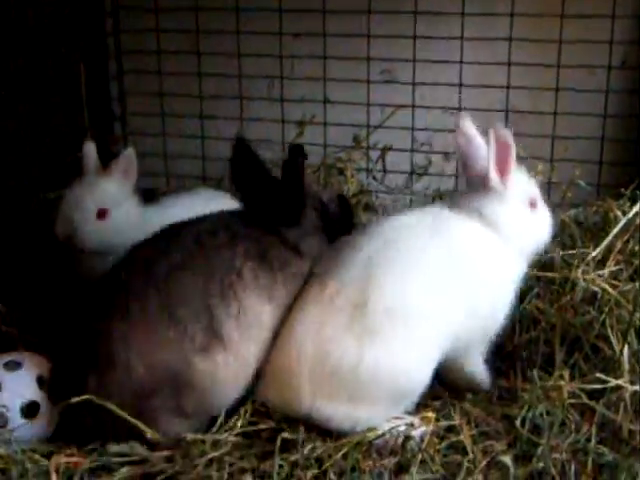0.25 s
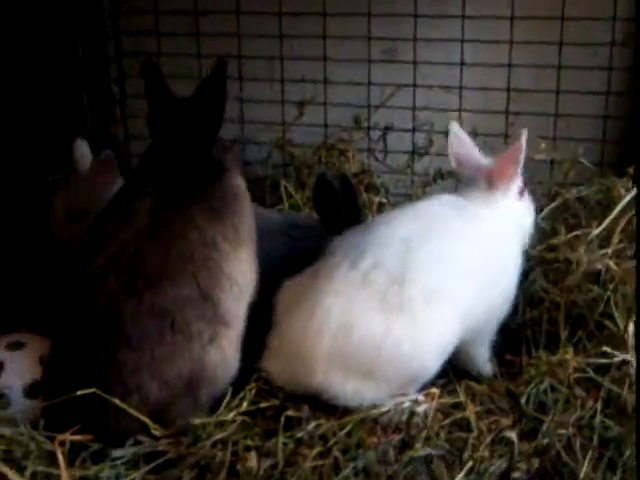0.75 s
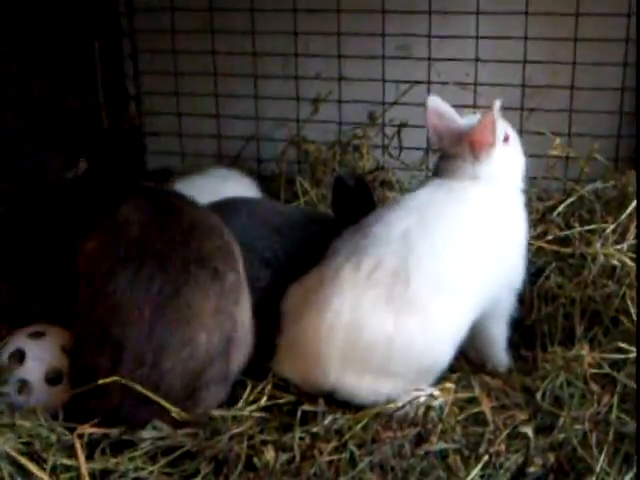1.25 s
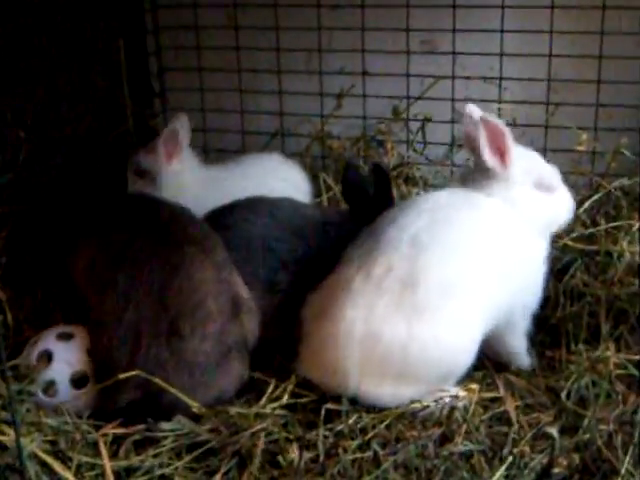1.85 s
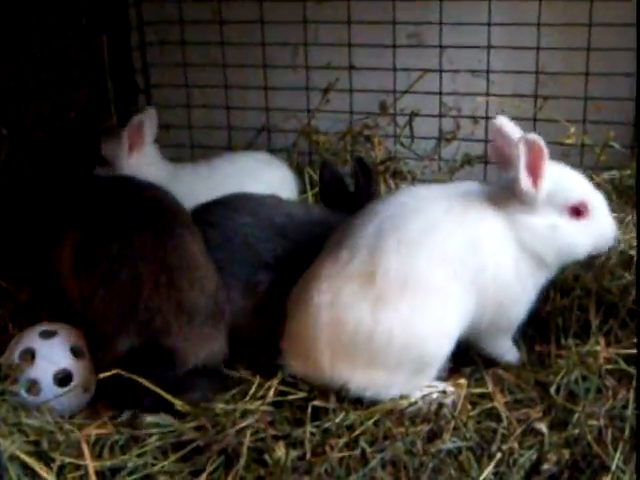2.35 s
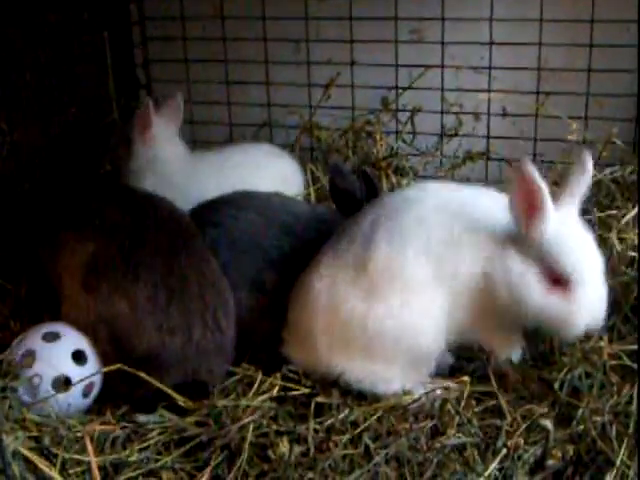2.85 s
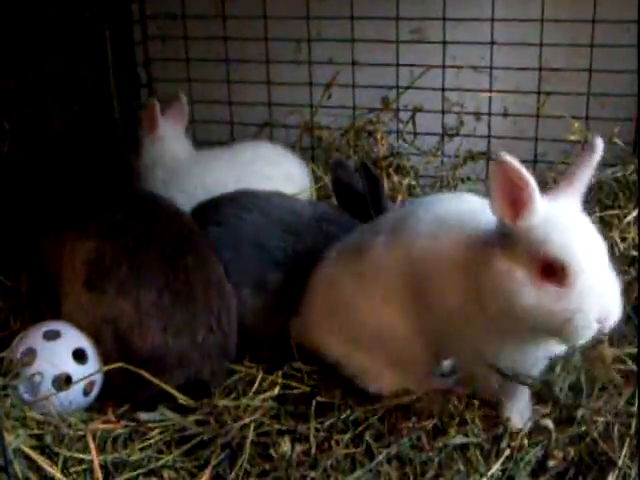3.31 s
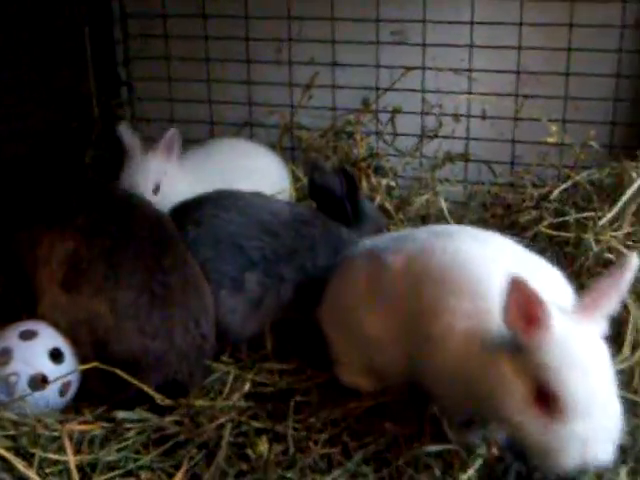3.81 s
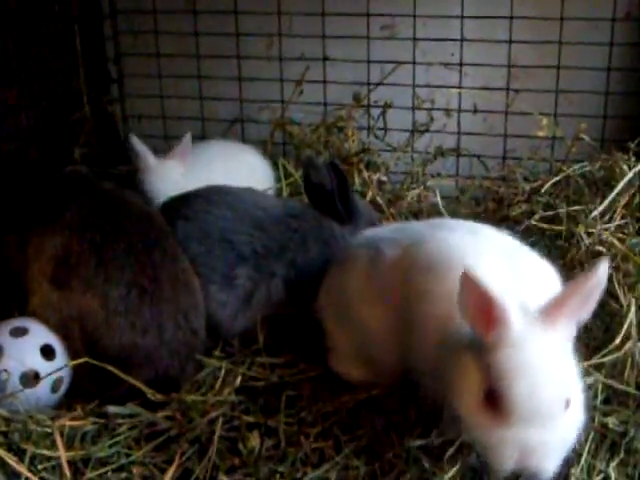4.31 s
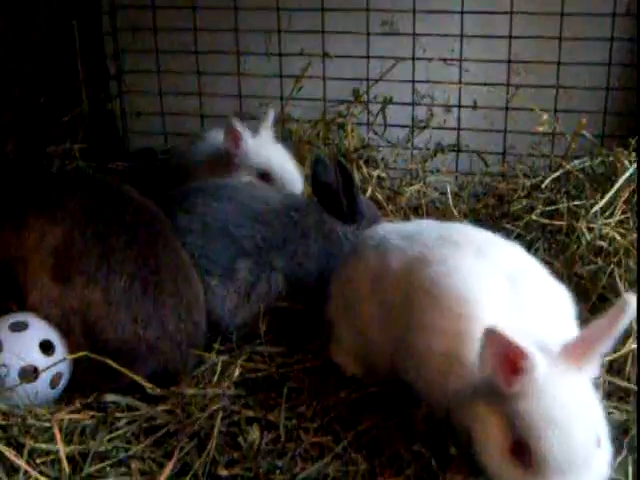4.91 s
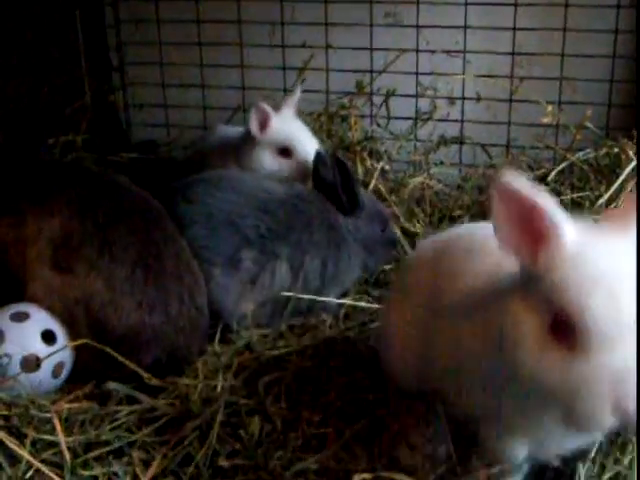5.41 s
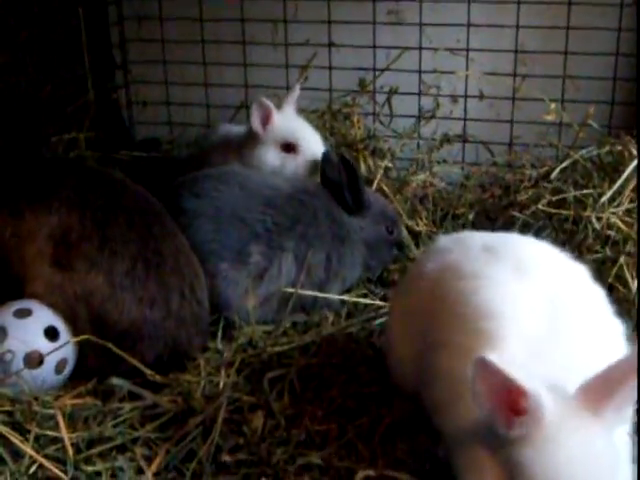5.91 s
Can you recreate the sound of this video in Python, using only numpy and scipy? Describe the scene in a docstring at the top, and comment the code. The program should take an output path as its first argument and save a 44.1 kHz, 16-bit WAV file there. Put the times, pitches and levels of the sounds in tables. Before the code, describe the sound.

Rabbits crunch dry hay in crisp, quick little bites over steady microphone hiss, with soft low thuds pulsing underneath and bedding rustling faintly.

```python
"""Rabbits chewing hay

Rabbits chew hay in an indoor pen, close to a small camera with a hissy microphone.
Each bite is a cluster of tiny fractures, about 10 ms long, ringing bright and dull resonances.
The bedding rustles in clumps of small clicks as the animals shift, with a few faint hollow bumps.
Soft low thuds, probably the camera's lens drive, are short pushes that recur about seven times a second.
Filtered noise makes the steady hiss, and a slightly wandering sine makes a thin whine."""
import sys
import numpy as np
from scipy import signal
from scipy.fft import rfft, irfft
from scipy.io import wavfile

SR = 44100
rng = np.random.default_rng(int(sys.argv[2]) if len(sys.argv) > 2 else 0)


def transcribe(u):
    """Save the signal u as a 16-bit wav file named by the first command-line argument.

    u: samples, shape (n,) or (channels, n), limited to [-1, 1]; the rate is SR.
    q: integer samples, one column per channel.
    """
    v = np.clip(np.atleast_2d(u).T, -1, 1)
    q = np.round(v * 32767).astype(np.int16)
    wavfile.write(sys.argv[1], SR, q)


N = 271636
TIME = np.arange(N) / SR


def gain_of(db):
    """Turns decibels into amplitude."""
    return 10 ** (np.asarray(db) / 20)


def evened(x):
    """Scales a sound to an rms (average strength) of 1."""
    return x / np.sqrt(np.mean(x ** 2) + 1e-20)


def add(mix, start_s, sound):
    """Mixes a sound in at a given time, cutting off what runs past the end."""
    part = mix[max(round(start_s * SR), 0):][:len(sound)]
    part += sound[:len(part)]


def coloured(x, points):
    """Filters x by a curve drawn through (Hz, dB) points, then scales it to rms 1."""
    points_hz, points_db = np.transpose(points)
    hz = np.fft.rfftfreq(N, 1 / SR) + 1  # the added 1 avoids log(0)
    curve_db = np.interp(np.log(hz), np.log(points_hz), points_db)
    return evened(irfft(rfft(x) * gain_of(curve_db), N))


def ringing(modes, size=2048):
    """Response of a body with several resonances to a click; nothing sounds before the click."""
    hz = abs(np.fft.fftfreq(size, 1 / SR)) + 1
    power = 0
    for mode_hz, width_hz, db in modes:
        detuning = (hz ** 2 - mode_hz ** 2) / (hz * width_hz)
        power = power + gain_of(db) ** 2 / (1 + detuning ** 2)
    # minimum phase: the ring starts as promptly as its spectrum allows
    log_spectrum = np.conj(signal.hilbert(np.log(power) / 2))
    return np.fft.ifft(np.exp(log_spectrum)).real


def drift(fastest_hz):
    """Slow random wander of rms 1, made of noise below fastest_hz."""
    spectrum = rfft(rng.standard_normal(N))
    slow = np.fft.rfftfreq(N, 1 / SR) < fastest_hz
    return evened(irfft(spectrum * slow, N))


def fractures(count, per_s, uneven_db):
    """Sparse clicks of either sign over count samples: many small, a few large."""
    size = gain_of(uneven_db * np.minimum(rng.exponential(1, count), 3))
    sign = rng.choice([-1, 1], count)
    happens = rng.random(count) < per_s / SR
    return size * sign * happens


def burst(drive, ring, db):
    """Rings a body with a short drive; db is its energy as an rms over 10 ms."""
    sound = signal.fftconvolve(drive, ring)
    energy = np.sum(sound ** 2) + 1e-20
    return gain_of(db) * sound * np.sqrt(.01 * SR / energy)


# The colour of the steady hiss.
# Each point: frequency in Hz, relative strength in dB per Hz.
HISS_COLOUR = [(15, 26.5), (35, 23.5), (70, 23.5), (130, 19), (260, 16), (480, 11.5), (720, 9.5), (1000, 7),
               (1800, 3.5), (2500, 1), (4000, 0), (5500, -1), (7400, 0), (9000, -8.5)]


def hiss(level_db=-52, waver_db=0.62):
    """Room and microphone noise: random noise given a colour, with a slight waver in level."""
    noise = coloured(rng.standard_normal(N), HISS_COLOUR)
    return noise * gain_of(level_db + waver_db * drift(fastest_hz=12))


def whine(pitch_hz=4290.8, waver_hz=.6, level_db=-74.5):
    """The camera's thin whine: one faint sine whose pitch wanders slightly."""
    pitch = pitch_hz + waver_hz * drift(fastest_hz=4.9)
    turns = np.cumsum(pitch) / SR
    return gain_of(level_db) * evened(np.sin(2 * np.pi * turns))


# The soft low thuds, all at the same level setting.
# Each row: start in seconds, length in ms.
THUD_TIMES = [(0.0939, 15.7), (0.2793, 9.3), (0.4165, 11.6), (.586, 13), (0.7189, 10), (.8719, 9.8),
              (1.006, 10.7), (1.1108, 12.7), (1.3012, 7.8), (1.402, 12), (1.55, 10.5), (1.6739, 8.6),
              (1.775, 10.2), (1.9458, 12), (2.0816, 11), (2.2799, 10.4), (2.4167, 10.8), (2.533, 10.4),
              (2.6656, 8.8), (2.7714, 9), (2.9422, 10), (3.0852, 11.7), (3.2395, 9.3), (3.4149, 12.3),
              (3.6727, 8.5), (3.829, 9.7), (4.0786, 9.05), (4.3339, 9), (4.466, 11.6), (4.617, 9),
              (4.748, 12), (4.9168, 9.6), (5.0667, 12), (5.245, 8.9), (5.413, 17.6), (5.5364, 9),
              (5.7037, 11.8), (5.8169, 11.6), (5.9802, 12.2), (6.081, 9.9)]
# What rings in the camera's case when a thud shakes it.
# Each row: frequency in Hz, width in Hz, relative strength in dB.
CASE_RESONANCES = [(180, 71, 4), (416, 39, -1.5), (620, 42, 1), (1254, 69, -7), (1500, 100, -14.5)]


def thuds(push_db=-36, shake_db=-52, edge_hz=400, leak_hz=6):
    """A flat push of about 10 ms switches on and off, and noise of that length shakes the case."""
    push, shake = np.zeros(N), np.zeros(N)
    case = ringing(CASE_RESONANCES)
    for start_s, ms in THUD_TIMES:
        count = round(ms * SR / 1000)
        add(push, start_s, -gain_of(push_db) * np.ones(count))
        add(shake, start_s, burst(rng.standard_normal(count), case, shake_db))
    # the microphone cannot hold a steady pressure, so each push swings back
    push = signal.lfilter(*signal.butter(1, leak_hz, "highpass", fs=SR), push)
    # the corners of the push are rounded off
    push = signal.lfilter(*signal.butter(2, edge_hz, fs=SR), push)
    return push + shake


# Faint hollow bumps in the pen.
# Each row: start in seconds, pitch in Hz, time to fade by 60 dB in seconds,
# level in dB (the ring is doubled on top of it).
BUMP_RINGS = [(0.515, 940, .05, -49.5), (2.190, 295, 0.1, -49.5), (2.213, 260, 0.086, -53.5)]


def bumps(soft_s=0.0028):
    """Each bump is one quickly damped sine with a soft start."""
    out = np.zeros(N)
    t = TIME[:SR // 4]
    for start_s, hz, fade_s, db in BUMP_RINGS:
        fade = np.exp(-np.log(1000) * t / fade_s)
        soft_start = 1 - np.exp(-t / soft_s)
        add(out, start_s, 2 * gain_of(db) * np.sin(2 * np.pi * hz * t) * fade * soft_start)
    return out


# The shuffles of a rabbit in the bedding.
# Each row: middle in seconds, length in seconds, level at the middle in dB.
SHUFFLE_TIMES = [(.09, .14, -60.5), (.3, 0.11, -56.5), (.52, .08, -60), (2.613, .1, -59.5),
                 (3.657, 0.14, -60), (4.69, 0.042, -56), (4.967, 0.069, -59), (5.42, 0.23, -54.5),
                 (5.822, 0.11, -56.5), (6.072, .2, -61)]
# The colour of rustling hay.
# Each point: frequency in Hz, relative strength in dB per Hz.
HAY_COLOUR = [(150, -4.5), (500, 4), (1300, 3), (2400, -2), (3300, 3.5), (4300, 0), (5500, -2),
              (6500, -0.5), (7400, -0.5), (8500, -3.5)]


def bedding(per_s=4000, uneven_db=4.0, clump_db=2.1, sharpness=1.38, resting_db=-72):
    """Stalks slide and crackle in clumps under the paws; each shuffle swells and dies away evenly."""
    clumps = gain_of(clump_db * drift(fastest_hz=15))
    grains = fractures(N, per_s, uneven_db) * clumps
    stir = np.zeros(N)
    for middle_s, length_s, db in SHUFFLE_TIMES:
        away = abs((TIME - middle_s) / length_s * 2)
        stir += gain_of(db) * np.exp(-away ** sharpness / 2)
    # the hay never lies quite still, so a resting level stays underneath
    return coloured(grains, HAY_COLOUR) * np.hypot(stir, gain_of(resting_db))


# The bites.
# Each row: middle in seconds, spread of the fractures in ms,
# level of the bright snap in dB (a tiny shared trim is added to it).
BITE_TIMES = [(0.116, 1.2, -59), (.1271, 2, -46), (0.2587, 1.7, -52), (0.3688, 1.7, -47.5),
              (0.561, 1.8, -50), (0.7928, 2.2, -45.5), (.9287, 2.4, -52.5), (1.1288, 2.1, -48.5),
              (1.2987, 1.3, -56), (1.499, 2.5, -47), (1.6968, 3.3, -55), (1.8274, 2.2, -51),
              (2.0317, 1.6, -55.5), (2.1974, 2.7, -51.5), (2.394, 2.1, -57), (2.5932, 2, -52.5),
              (2.6954, 1.6, -55), (2.8993, 1.9, -52), (3.0340, 1.7, -56.5), (3.235, 1.8, -47.5),
              (3.3717, 1.7, -56), (3.5582, 1.6, -49), (3.6954, 2.2, -52), (3.8967, 1.9, -47.5),
              (4.0947, 1, -51), (4.2153, 0.64, -61), (4.227, 1.9, -46.5), (4.459, 1.5, -52),
              (4.6723, 0.63, -55.5), (4.6860, 1.4, -49), (4.7000, 1.7, -47.5), (4.8302, 1.9, -52)]
# The bright resonances that ring in every bite.
# Each row: frequency in Hz, width in Hz, relative strength in dB.
SNAP_RESONANCES = [(5000, 200, -10), (5620, 380, -.7), (6160, 260, 0), (6650, 400, -10), (7150, 400, -9),
                   (7560, 450, -8.5), (8100, 500, -11)]
# The dull resonances that ring in every bite.
# Each row: frequency in Hz, width in Hz, relative strength in dB.
CRUNCH_RESONANCES = [(286, 61, -1), (615, 67, 4.5), (746, 60, 2), (994, 100, -1), (1270, 320, -7),
                     (1510, 150, -4), (1840, 180, -5), (2040, 160, -8), (3097, 240, -0.5),
                     (3400, 230, -5.5), (4030, 280, -4.5)]


def chewing(per_s=7000, uneven_db=4.5, snap_trim_db=0.07, crunch_spread=1.53, squareness=2.7,
            usual_snap_db=-51.5, usual_crunch_db=-51, crunch_follows=0.47):
    """A dry stalk gives way in a quick swell of fractures, which ring bright and dull resonances."""
    out = np.zeros(N)
    snap, crunch = ringing(SNAP_RESONANCES), ringing(CRUNCH_RESONANCES)
    ms = np.arange(-12, 12, 1000 / SR)  # time around the middle of a bite
    for middle_s, spread_ms, snap_db in BITE_TIMES:
        start_s = middle_s - len(ms) / 2 / SR
        cracks = fractures(len(ms), per_s, uneven_db)
        swell = np.exp(-abs(ms / (2 * spread_ms)) ** squareness)
        longer_swell = swell ** (1 / crunch_spread ** 2)
        # the dull crunch follows the snap, but varies less from bite to bite
        crunch_db = usual_crunch_db + crunch_follows * (snap_db - usual_snap_db)
        add(out, start_s, burst(cracks * swell, snap, snap_db + snap_trim_db))
        add(out, start_s, burst(cracks * longer_swell, crunch, crunch_db))
    return out


def pen(x, fade_s=0.02, wet_db=-19, size=6000):
    """The near walls return a short, faint tail, fading 60 dB in fade_s; the hay soaks up the rest."""
    t = np.arange(size) / SR
    tail = rng.standard_normal(size) * gain_of(-60 * t / fade_s)
    tail *= t > .002  # the first echo needs 2 ms to return
    echo = signal.fftconvolve(x, tail / np.linalg.norm(tail))[:N]
    return x + gain_of(wet_db) * echo


def scene():
    """The camera's own noises, and the rabbits in their pen."""
    camera = hiss() + whine() + thuds()
    rabbits = bumps() + bedding() + chewing()
    return (camera + pen(rabbits))[None]


# Everything is louder for the first instant.
# Each point: time in seconds, gain in dB.
OPENING_GAIN = [(.15, 4), (.165, -0.5)]


def record(dry, notch_hz=4715, notch_width_hz=110, notch_db=-7, droop_hz=7250, droop_db=-8.0, edge_hz=9030):
    """The microphone port cuts a notch and the top rolls off ever faster; then the band limit."""
    hz = np.fft.rfftfreq(N, 1 / SR)
    port = gain_of(notch_db / (1 + ((hz - notch_hz) / notch_width_hz) ** 2))
    # droop_db is the loss 1 kHz above droop_hz; it grows with the square of the distance
    droop = gain_of(droop_db * (np.maximum(hz - droop_hz, 0) / 1000) ** 2)
    opening = gain_of(np.interp(TIME, *np.transpose(OPENING_GAIN)))
    heard = irfft(rfft(dry * opening) * port * droop, N)
    band_limit = signal.firwin(511, edge_hz, window=("kaiser", 9), fs=SR)
    return signal.oaconvolve(heard, band_limit[None], "same")


dry = scene()
out = record(dry)
transcribe(out)
```